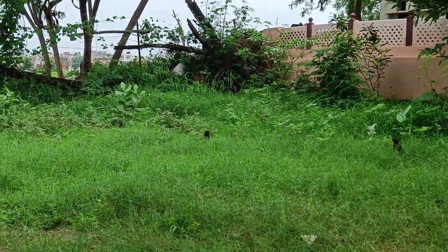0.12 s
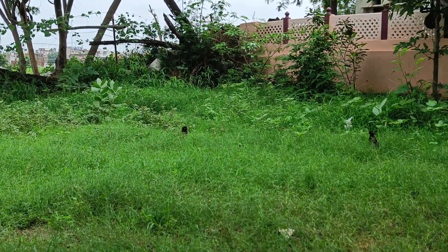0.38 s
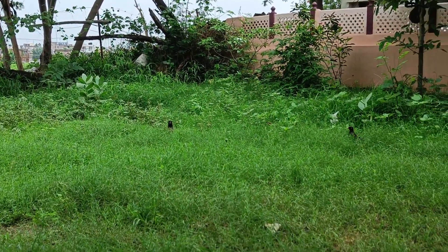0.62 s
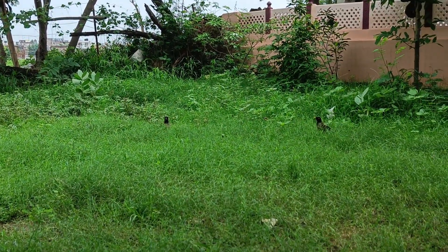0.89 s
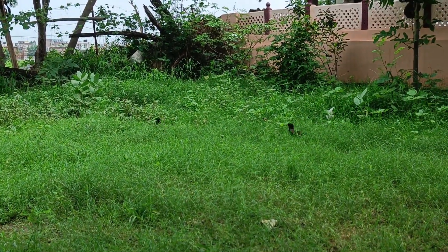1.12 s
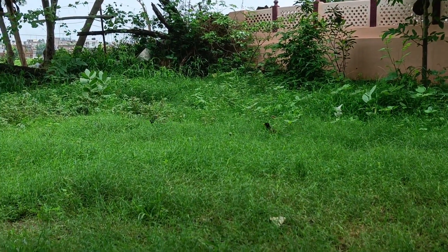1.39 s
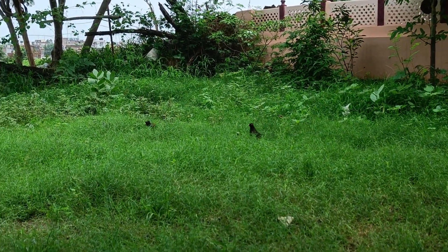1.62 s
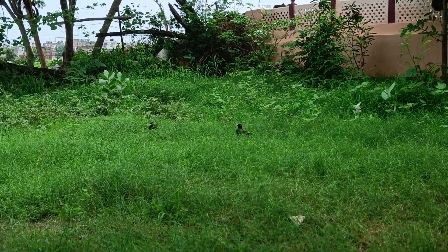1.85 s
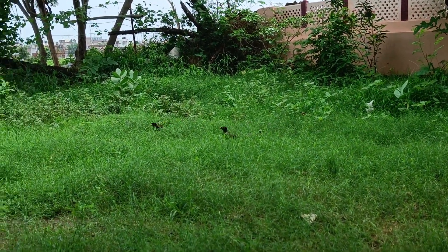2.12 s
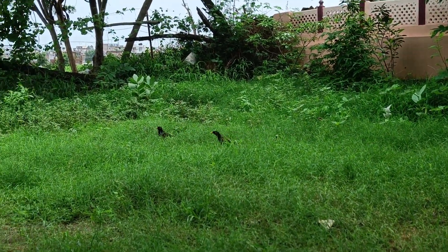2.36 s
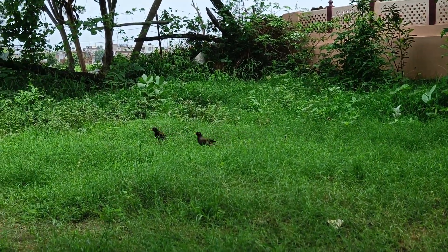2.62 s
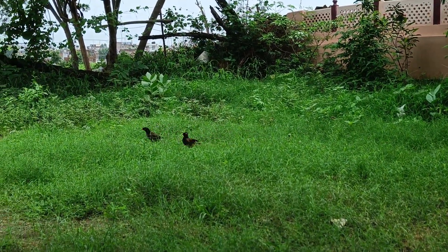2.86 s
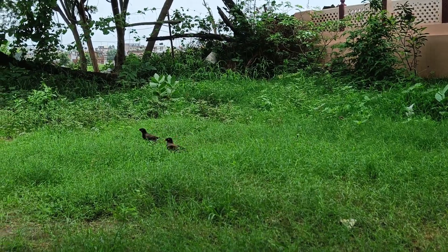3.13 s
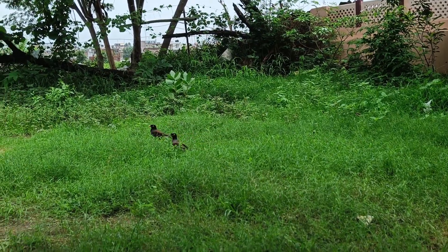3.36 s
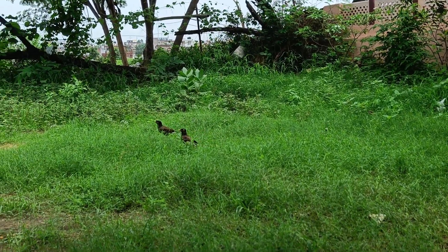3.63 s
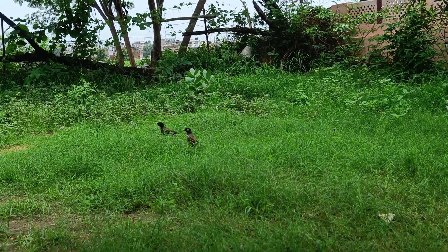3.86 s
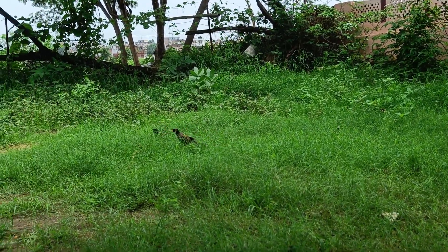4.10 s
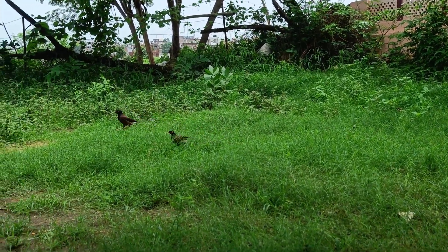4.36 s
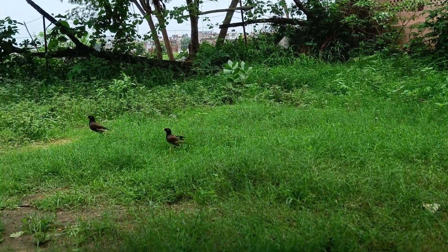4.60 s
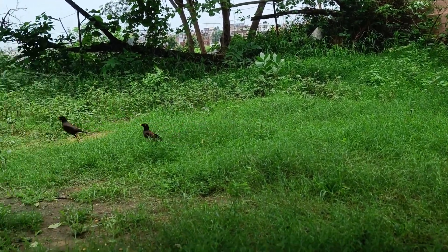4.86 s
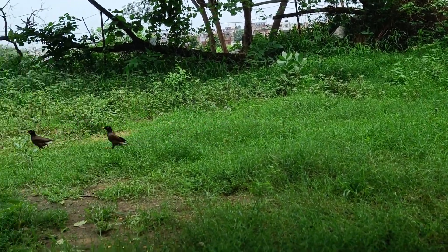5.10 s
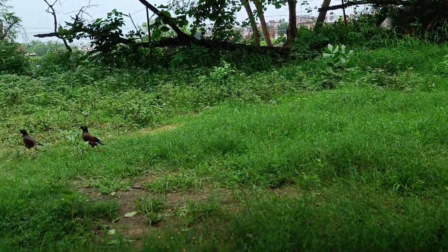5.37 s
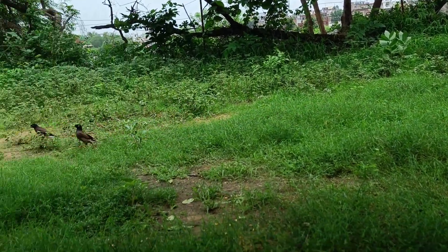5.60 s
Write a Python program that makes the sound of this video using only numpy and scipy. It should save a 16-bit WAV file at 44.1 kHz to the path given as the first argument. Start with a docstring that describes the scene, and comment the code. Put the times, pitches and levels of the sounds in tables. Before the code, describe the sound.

Outdoor stereo recording of birds in open grass, with distant town rumble and light wind buffeting. Quiet at first: a cut-off squawk, faint song phrases, a run of harsh rasps and knocks, high far chips, whistles and cooing doves. Then piercing chips, far louder than everything else, fire rapidly from a near caller, pause, and repeat briefly. Falling calls, coos and hissy puffs fill the gap before a final short burst. Leaves and wall add a slight tail.

```python
"""Birds on open grass ringed by trees and a wall, heard at two microphone ports over distant town rumble and wind.
It opens on dying husky notes, a squawk of pulsed noise, far caws and a twice-sung song; rasps and knocks follow.
Whistles, far chips and rising calls run on, and doves coo: gliding partials of a membrane, some with breath noise.
From 3.2 s a near caller fires sharp rising chips through a ringing throat, with falling calls among and after them.
Late on, thin chips and hissy puffs lead to a last burst of chips; leaves and wall scatter every call into a tail."""
import sys
import numpy as np
from scipy import signal
from scipy.fft import rfft, irfft
from scipy.io import wavfile
from scipy.ndimage import uniform_filter1d

SR = 44100
rng = np.random.default_rng(int(sys.argv[2]) if len(sys.argv) > 2 else 0)


def boost(x):
    """Linear amplitude factor 10**(x/20) for a level x in decibels (scalar or array-like)."""
    u = np.asarray(x, float) / 20
    return 10 ** u


def materialize(psi):
    """Save the field psi as 16-bit PCM at rate SR to the path in sys.argv[1].

    A 1-D psi becomes a single channel; in a 2-D psi each row is a channel.
    """
    bounded = np.clip(np.atleast_2d(psi).T, -1, 1)
    quanta = np.round(bounded * 32767).astype(np.int16)
    wavfile.write(sys.argv[1], SR, quanta)


N = 252693  # samples in the scene

# Call shapes before each event's stretch, pitch factor and level: t/ms from the event, f/Hz, level/dB
CHIP_SHAPE = [(-9, 2300, -26), (-7, 2900, -14), (-5, 3800, -8), (-3.5, 5300, -8), (-1.5, 7400, -4),
              (.5, 8800, 0), (4, 10800, -4), (8, 12500, -6), (13, 13600, -10), (17, 13300, -22)]
THIN_SHAPE = [(-8, 3300, -34), (-6, 3800, -24), (-4, 6800, -16), (-2, 8000, -4), (0, 8700, 0),
              (4, 11500, -5), (7, 14000, -5), (10, 15200, -4), (15, 15500, -20)]
SEEP_SHAPE = [(-8.5, 8700, -11), (1, 7400, -18), (0.5, 8500, 7), (7.5, 9300, -4), (15, 10200, -15),
              (32.5, 14000, -30)]
FALL_SHAPE = [(-35, 5500, -24), (-25, 5250, -10), (-10, 4450, -22), (0, 3850, -3), (15, 3350, -4),
              (24, 3000, -14), (36, 2520, 0), (48, 2500, 0), (52, 2350, -20), (62, 2050, -7),
              (75, 1750, -9), (90, 1550, -24)]
RISE_SHAPE = [(-22, 1800, -17), (-9.5, 2250, -7.5), (5, 2950, -.5), (16.5, 3050, -2.5), (33, 3400, -15.5),
              (44, 2900, -35)]
RASP_SHAPE = [(-15.5, 1300, -31), (-7, 1350, -3.5), (-0.5, 1330, -1.5), (8.5, 1170, -2), (16, 1020, -6),
              (27, 960, -17), (29, 900, -30)]
RASP_HISS_SHAPE = [(-30, 1495, -36), (-20.5, 1700, -5), (3.5, 1700, -1.5), (7.5, 1700, -1.5),
                   (13, 1460, -5.5), (30.5, 1300, -20), (51, 1300, -37)]
KNOCK_SHAPE = [(-5.5, 1030, -26), (-0.5, 1100, -1), (1.5, 1100, 0), (4.5, 1200, -13), (9, 1100, -33)]
CAW_SHAPE = [(-8, 530, -16), (5, 545, 0), (40, 548, -1), (70, 540, -2), (95, 520, -16)]
# The five notes of a song: t/ms from the song's start, f/Hz, level/dB
TSIP_SHAPE = [(-28, 5520, -21), (-17, 5444, -7.5), (4, 5200, -21), (40, 5400, -24)]
SLIDE_SHAPE = [(-5.5, 3250, -14), (0, 2730, -6), (22, 2560, -1), (60, 2150, -6), (96.5, 2240, -16.5),
               (134, 2350, -9.5)]
BURR_SHAPE = [(68, 2930, -15), (83.5, 2900, -2), (100.4, 2720, -10), (116.3, 3150, -7.5),
              (132.6, 2600, -17)]
PIPE_SHAPE = [(89.7, 3120, -2.5), (126.5, 3130, -2), (146, 3150, 0.5), (183, 3160, -12.5),
              (213.6, 3140, -14), (242, 1800, -32)]
DROP_SHAPE = [(145.5, 2700, -11), (156.8, 2540, -4), (167.3, 2170, 2), (183.4, 1990, -1), (206, 1940, -5.5),
              (255, 2030, -16), (325, 1950, -24)]

# Membrane partials: multiple of the pitch, level/dB
CHIP_PARTIALS = [(1, -0.73), (2, -0.5)]
FALL_PARTIALS = [(1, 0), (2, -6)]
RISE_PARTIALS = [(1, -3.5), (1.5, -11.5), (2, -14)]
RASP_PARTIALS = [(3, -0.5), (4, -10.5), (5, -5), (6, -9)]
KNOCK_PARTIALS = [(1, -0.32), (1.38, -0.47)]
CAW_PARTIALS = [(1, -3.5), (1.5, -14), (2, -4), (2.5, -18), (3, -21)]

# Near rising chips: t/s, level/dB, pitch factor, time stretch, factor on the throat's low rings as the neck stretches
CHIP_EVENTS = [(3.234, -16, .97, 1.08, 0.96), (3.284, -14, 1, 0.97, 0.97), (3.352, -13, 1.02, 1.02, 1.007),
               (3.432, -15.5, 1.0, 0.92, 1.04), (3.503, -14.5, 0.98, 0.98, 0.99),
               (3.575, -12.5, 1, .79, 0.994), (3.9, -15, 1.024, .95, 1.06), (3.96, -16.5, .97, 1.0, .99),
               (5.54, -21, 0.94, 0.96, 1.03), (5.592, -18, 0.95, 0.99, .94),
               (5.666, -23.5, 0.94, 0.94, 1.06)]
# The chip caller's throat, rings below 5000 Hz before that factor: f/Hz, gain/dB
THROAT_RINGS = [(2000, -1.5), (2900, -12), (3400, -12.5), (3750, 6), (4150, -5.5), (4700, -17.5),
                (5800, -13.5), (7000, -7), (8600, 0), (10500, -8.5), (13000, -7.5), (14500, 3),
                (15800, 1.5)]
# Repeated calls: t/s, level/dB, pitch factor
THIN_EVENTS = [(3.158, -22, 1.014), (3.2256, -20.5, 1.02), (5.038, -48.5, 1), (5.063, -44.5, .96),
               (5.112, -41.5, .94), (5.141, -41, .95), (5.181, -45.5, .9), (5.219, -41, .93),
               (5.294, -44, .92)]
FALL_EVENTS = [(3.841, -43.5, 0.98), (4.09, -44, 0.99), (4.388, -45, 0.97)]
RISE_EVENTS = [(1.346, -61, 0.78), (1.409, -72, 0.88), (1.86, -64, 0.84), (2.506, -58.5, 1.16),
               (2.667, -63, 0.98), (2.859, -61.5, 1.18), (4.52, -53.5, 1.0), (4.824, -54.5, 0.99),
               (5.03, -56, 1.05), (5.223, -55.5, 1.05)]
RASP_EVENTS = [(0.592, -47, 0.96), (.692, -41, 0.95), (0.794, -40.5, 0.94), (0.894, -40.5, 0.94),
               (0.996, -42.5, 0.96), (1.103, -46.5, 0.93)]
KNOCK_EVENTS = [(1.134, -55, 0.78), (1.177, -55, 0.91), (1.222, -52, 0.93), (1.267, -54, 0.95),
                (1.313, -53.5, 0.97), (1.359, -56, 0.94), (1.797, -62, 0.94)]
SONG_EVENTS = [(.204, -42, 1.0), (.628, -44.5, 0.98)]
CAW_EVENTS = [(.09, -58, 1.0), (.345, -55.5, 1.01)]
# Far high chips, and hissy puffs: t/s, level/dB
SEEP_EVENTS = [(.22, -55), (1.871, -51), (1.896, -44), (1.925, -45.5), (1.957, -42), (1.99, -50.5),
               (2.03, -44.5), (2.092, -39.5), (2.13, -48), (2.168, -44), (2.254, -42.5), (2.30, -51.5),
               (2.591, -56.5), (4.389, -55.5), (5.014, -58)]
PUFF_EVENTS = [(5.222, -52), (5.3, -50), (5.382, -51.5), (5.457, -52.5)]
# Distance of faint chips: level/dB heard all direct, direct dB lost per dB, stretch, stretch gained per dB
THIN_DISTANCE = (-18.5, 1.6, 0.67, 0.1247)
SEEP_DISTANCE = (-24, 1.1, .9, .01)

# Free notes, drawn 1 % below these pitches: start t/s, length t/s, first f/Hz, f/Hz glided to, level/dB
GLIDE_NOTES = [(.76, 0.069, 1295, 1328, -54), (1.1, 0.04, 6900, 7000, -56), (1.24, 0.3, 3025, 2997, -64),
               (1.3, .09, 5340, 6500, -84), (1.36, 0.035, 3030, 2350, -57.5),
               (1.36, 0.044, 3500, 3830, -65), (1.49, 0.056, 5230, 6130, -71),
               (1.69, 0.087, 5260, 6800, -77), (1.88, 0.031, 3990, 3590, -51.5),
               (1.94, .035, 3630, 3626, -53.5), (2.185, 0.091, 4580, 3970, -54.5),
               (2.26, .045, 4060, 2630, -49.5), (2.6, 0.1, 4000, 3700, -57), (2.63, 0.053, 5700, 5670, -62),
               (3.075, 0.14, 3940, 3700, -59.5), (3.61, .09, 3700, 1200, -53.5),
               (5.11, 0.096, 3530, 3550, -63.5), (5.24, .12, 3500, 3550, -66)]
COO_NOTES = [(2.085, 0.097, 567, 690, -57), (2.22, 0.1, 585, 753, -50.5), (2.36, 0.11, 719, 797, -50),
             (2.45, 0.095, 728, 783, -47.5), (2.552, .065, 707, 772, -46.5), (2.692, .065, 673, 770, -47),
             (3.62, .24, 616, 626, -52.5), (4.005, .09, 586, 657, -54.5), (4.25, .14, 591, 758, -50),
             (4.46, .12, 691, 759, -48), (4.578, 0.051, 710, 790, -53), (4.712, 0.063, 626, 699, -43)]
HUSKY_NOTES = [(0, 0.087, 1850, 2000, -37.5), (0, 0.033, 1466, 1520, -45)]
# Reedy whistles, the same columns and then: octave level/dB over the note
REEDY_NOTES = [(1.9, .07, 1447, 1554, -59, -13), (1.97, .19, 1493, 1684, -57.5, 1.9),
               (2.105, 0.15, 2473, 2205, -54.5, -12.5), (2.545, .065, 2160, 2190, -55.5, -1),
               (3.005, 0.084, 2083, 2254, -60, -0.5)]
# A squawk dying away; centre and width are averaged over the call: t/s, centre f/Hz, width f/Hz, level/dB
SQUAWK_TRACE = [(0, 2230, 1980, -40.5), (.05, 2300, 2010, -58.5), (.12, 2250, 2030, -70),
                (.2, 2300, 2000, -69)]

# Scattering by leaves and wall: f/Hz, time to fall 60 dB t/s
SCATTER_DECAY = [(500, 0.69), (2000, 0.4), (4000, 0.29), (8000, 0.35), (14000, 0.31)]
# Town and leaves ahead of the ports: f/Hz, level/dB per Hz, likeness of the ports (-1 opposed to 1 alike)
AIR_SPECTRUM = [(20, -93, .7), (50.25, -80.5, .9), (74.9, -79.5, 0.98), (124, -79, 0.97), (282, -84, 0.85),
                (640, -90, 0.32), (1385, -94.5, -.35), (2350, -101, 0.03), (3700, -107, 0), (6500, -107, 0),
                (9000, -111, 0.3), (13180, -116, 0.11), (16320, -120, 0.27)]
# Wind ahead of the ports' resonances: t/s, level/dB
WIND_LEVEL = [(0.0, -59), (0.03, -62.5), (3.19, -74.5), (3.22, -57), (3.48, -69), (3.53, -57), (3.67, -67),
              (4.1, -53.5), (4.12, -61.5), (4.99, -61.5), (5.15, -54), (5.2, -62), (5.68, -57.5),
              (5.73, -72)]
# Port resonances: f/Hz, left gain/dB, right gain/dB
PORT_GAIN = [(99.8, 2, 1.5), (970, 1.5, 0.5), (2292, 8.5, 3), (3700, 8, 1), (4600, 5, 4.5), (6500, -1, 4.5),
             (7840, 5.5, 5), (8347, 15.5, 1), (9840, 1.5, -16), (10450, -3, -22.5), (11180, -5, -19.5),
             (12580, 8.5, -9.5), (15300, -8, -2.5), (15160, -2, -5.5), (15900, -8.5, -4.5)]

AHEAD_LAG, BEHIND_LAG, SIDE_LAG = 19, -14, 2  # samples by which the left port hears later


def colour(x, points, column):
    """Filter by a gain curve in dB drawn over log frequency."""
    p = np.array(points)
    hz = np.fft.rfftfreq(x.shape[-1], 1 / SR)
    gain_db = np.interp(np.log(hz + 1), np.log(p[:, 0]), p[:, column])
    return irfft(rfft(x) * boost(gain_db), x.shape[-1])


def wobble(n, hz):
    """Smooth chance of spread 1, changing about hz times a second."""
    k = max(int(SR / hz), 1)
    smooth = uniform_filter1d(uniform_filter1d(rng.standard_normal(n), k), k)
    return smooth * np.sqrt(1.5 * k)  # makes up the spread lost to smoothing


def add(bus, start, sound):
    """Lay a sound on a bus from a start in seconds."""
    i = int(start * SR)
    bus[i:i + len(sound)] += sound[:N - i]


def trace(rows):
    """Draw a table's columns sample by sample, with a 2.4 ms soft edge for both ends."""
    s, *columns = np.transpose(rows)
    t = np.arange(s[0], s[-1], 1 / SR)
    edge = np.clip(np.minimum(t - s[0], s[-1] - t) / 0.0024, 0, 1)
    return [np.interp(t, s, c) for c in columns], edge


def syrinx(hz, partials, rough, flutter_hz=400, top_hz=16000, low_hz=0):
    """Vibrating membrane: roughness shakes pitch and strength; partials other than 1 fade towards the range's ends."""
    shaken_hz = hz * (1 + 0.094 * rough * wobble(len(hz), flutter_hz))
    phase = 2 * np.pi * np.cumsum(shaken_hz) / SR
    tone = 0
    for k, db in partials:
        room_hz = np.minimum(top_hz - k * hz, k * hz - low_hz)
        fade = np.clip(room_hz / 800, k == 1, 1)  # a partial at exactly 1 is never faded
        tone = tone + boost(db) * np.sin(k * phase) * fade
    return np.sqrt(2) * tone * boost(9.1 * rough * wobble(len(hz), flutter_hz))


def repeat(shape, events, partials, rough, breath_db=-40, breath_hz=(2500, 9500), throat=None, **voice):
    """Play a call at each event as membrane plus gusty breath; returns direct sound and what the leaves get."""
    direct, full = np.zeros(N), np.zeros(N)
    airway = signal.butter(3, breath_hz, "bandpass", fs=SR, output="sos")
    for s, db, factor, *more in events:
        stretch, direct_db = more or (1, 0)
        (hz, shape_db), edge = trace([(ms * stretch / 1000, f, d) for ms, f, d in shape])
        # the airstream tears into short gusts
        gusts = boost(breath_db + 1.4 * wobble(len(hz), 580))
        breath = signal.sosfilt(airway, rng.standard_normal(len(hz)) * gusts)
        call = syrinx(hz * factor, partials, rough, **voice) + breath
        call = call * boost(db + shape_db) * edge
        if throat:
            call = colour(call, throat(s), 1)
        start = s + shape[0][0] * stretch / 1000
        add(direct, start, call * boost(direct_db))
        add(full, start, call)
    return direct, full


def ranged(events, near_db, loss, stretch, smear):
    """Distance from loudness: a fainter chip has less direct sound and a slower sweep."""
    placed = []
    for s, db, *factor in events:
        pitch = factor[0] if factor else 1
        placed.append((s, db, pitch, stretch + smear * (near_db - db), loss * (db - near_db)))
    return placed


def notes(rows, attack_s, release_s, glide=0.95, droop=0.0, sag_db_per_s=0.0, edge_db=14):
    """Attack, hold, release; pitch glides over a share of the note and droops as the breath runs out."""
    u, out = np.linspace(0, 1, num=25), []
    for s, length, first, last, db, *octave in rows:
        rise = np.clip(1 - u * length / attack_s, 0, 1)
        fall = np.clip(1 - (1 - u) * length / release_s, 0, 1)
        level = db - edge_db * (rise + fall) - sag_db_per_s * u * length
        hz = (first + (last - first) * np.clip(u / glide, 0, 1)) * (1 - droop * fall)
        out.append(np.transpose([s + u * length, hz, level] + [level + own for own in octave]))
    return out


def free_notes(traced, rough, flutter_hz=400):
    """Membrane sings free notes; the octave follows its own column where there is one."""
    bus = np.zeros(N)
    for rows in traced:
        (hz, db, *octave), edge = trace(rows)
        stack = [(0.99, db)] + [(2, own) for own in octave]
        add(bus, rows[0][0], edge * syrinx(hz, stack, rough, flutter_hz))
    return bus, bus


# Each voice below returns rows of: (direct, scattered) sound, lag in samples, left minus right dB, scatter dB

def throat_at(s):
    """The chip caller's throat at one moment, its low rings shifted as the neck stretches."""
    factor = {row[0]: row[-1] for row in CHIP_EVENTS}[s]
    return [(hz * factor if hz < 5000 else hz, db) for hz, db in THROAT_RINGS]


def near_chips():
    """Sharp rising chips: a fast membrane sweep and bright breath ring the throat."""
    direct_db = 1.33
    events = [(*row[:-1], direct_db) for row in CHIP_EVENTS]
    chips = repeat(CHIP_SHAPE, events, CHIP_PARTIALS, rough=0.11, breath_db=-16.5, breath_hz=(3000, 15900),
                   throat=throat_at, top_hz=10500)
    return [(chips, AHEAD_LAG, 1.0, -4)]


def far_air(s):
    """Air and leaves dull the top of the thin chips, by half a dB for each dB that distance takes."""
    db = {row[0]: row[1] for row in THIN_EVENTS}[s]
    return [(9000, 0.0029), (13000, 0.5 * (db - THIN_DISTANCE[0]))]


def thin_chips():
    """Thin chips near and far: a single swept partial with faint breath, smeared and dulled by distance."""
    events = ranged(THIN_EVENTS, *THIN_DISTANCE)
    return [(repeat(THIN_SHAPE, events, [(0.98, 0.0029)], rough=0.033, throat=far_air), AHEAD_LAG, 1.0, -3)]


def far_chips():
    """Far high chips: a rough membrane sweep heard more through its scatter the fainter it is."""
    events = ranged(SEEP_EVENTS, *SEEP_DISTANCE)
    return [(repeat(SEEP_SHAPE, events, [(0.93, -0.5), (1.4, -19.5)], rough=0.39), AHEAD_LAG, 1.0, -4)]


def chatter():
    """Rasps of fluttering overtones with hiss over them, and short two-partial knocks."""
    rasps = repeat(RASP_SHAPE, RASP_EVENTS, RASP_PARTIALS, rough=0.3, flutter_hz=910)
    hiss = repeat(RASP_HISS_SHAPE, RASP_EVENTS, [(0.93, -14)], rough=0.35, breath_db=1.5)
    knocks = repeat(KNOCK_SHAPE, KNOCK_EVENTS, KNOCK_PARTIALS, rough=0.1)
    return [(rasps, SIDE_LAG, -2.0, -6), (hiss, SIDE_LAG, -2.0, -6), (knocks, SIDE_LAG, -1.0, -10)]


def falling_calls():
    """Falling calls: the membrane's octave sounds only within a middle band."""
    falls = repeat(FALL_SHAPE, FALL_EVENTS, FALL_PARTIALS, rough=0.2, top_hz=7980, low_hz=5090)
    return [(falls, BEHIND_LAG, -3.0, -8)]


def rising_calls():
    """Breathy rising calls: three partials with strong airway noise."""
    rises = repeat(RISE_SHAPE, RISE_EVENTS, RISE_PARTIALS, rough=0.12, breath_db=-3.0, breath_hz=(2000, 5000))
    return [(rises, AHEAD_LAG, 3.0, -6)]


def song():
    """A five-note song sung twice, its notes overlapping and differing in roughness."""
    slide = repeat(SLIDE_SHAPE, SONG_EVENTS, [(0.99, -.3)], rough=0.17)
    drop = repeat(DROP_SHAPE, SONG_EVENTS, [(1, -.3)], rough=0.24)
    tsip = repeat(TSIP_SHAPE, SONG_EVENTS, [(0.99, -.3)], rough=.15)
    burr = repeat(BURR_SHAPE, SONG_EVENTS, [(1, -.3)], rough=0.65, flutter_hz=695)
    pipe = repeat(PIPE_SHAPE, SONG_EVENTS, [(1, -1.9), (2, -5.5)], rough=0.11)
    return [(slide, BEHIND_LAG, -6.0, -5), (drop, BEHIND_LAG, -6.0, -5), (tsip, AHEAD_LAG, 1.1, -6),
            (burr, AHEAD_LAG, 1.1, -5), (pipe, AHEAD_LAG, 1.1, -6)]


def gliding_partials():
    """Single gliding partials: whistles, loose octaves of reedy calls, low rings of far chips and a falling call."""
    glides = notes(GLIDE_NOTES, attack_s=0.013, release_s=0.022)
    return [(free_notes(glides, rough=0.16), AHEAD_LAG, 1.0, -6)]


def reedy_whistles():
    """Reedy whistles: a gliding partial and its octave, drooping as the breath runs out."""
    reedy = notes(REEDY_NOTES, attack_s=.03, release_s=0.042, glide=.6, droop=0.12)
    return [(free_notes(reedy, rough=0.11), AHEAD_LAG, 1.0, -6)]


def husky_notes():
    """Rough fluttering notes dying steadily away as the scene opens."""
    husky = notes(HUSKY_NOTES, attack_s=.001, release_s=.02, sag_db_per_s=388, edge_db=1)
    return [(free_notes(husky, rough=0.6, flutter_hz=695), AHEAD_LAG, 1.0, -5)]


def dove_coos():
    """Soft low coos: slow flutter, an early glide and a droop as the breath runs out."""
    coos = notes(COO_NOTES, attack_s=0.026, release_s=.03, glide=0.54, droop=.2, edge_db=8)
    return [(free_notes(coos, rough=0.14, flutter_hz=80), BEHIND_LAG, -1.0, -13)]


def crow_caws():
    """Far caws: a very rough membrane with partials at whole and half multiples."""
    return [(repeat(CAW_SHAPE, CAW_EVENTS, CAW_PARTIALS, rough=0.54), SIDE_LAG, -1.0, -6)]


def squawk():
    """Noise swelled by an uneven throat pulse, through one broad resonance."""
    (hz, width, db), _ = trace(SQUAWK_TRACE)
    pulse_hz = 291 * (1 + 0.11 * wobble(len(hz), 185))
    pulse = 1 + 0.3 * np.sin(2 * np.pi * np.cumsum(pulse_hz) / SR)
    band = [hz.mean() - width.mean() / 2, hz.mean() + width.mean() / 2]
    resonance = signal.butter(2, band, "bandpass", fs=SR, output="sos")
    call = signal.sosfilt(resonance, pulse * rng.standard_normal(len(hz)))
    bus = np.zeros(N)
    add(bus, SQUAWK_TRACE[0][0], call / call.std() * boost(db))
    return [((bus, bus), BEHIND_LAG, -1.0, -10)]


def puffs():
    """Bursts of treble hiss with no tone, perhaps wingbeats."""
    attack_ms, release_ms = 11, 27
    shape = [(-attack_ms, 1, -18), (0, 1, 0), (release_ms, 1, -14)]
    events = [(s, db, 1) for s, db in PUFF_EVENTS]
    hiss = repeat(shape, events, [], rough=0, breath_db=1.5, breath_hz=(6000, 15500))
    return [(hiss, AHEAD_LAG, 1.1, -5)]


def leaves(gap_ms=0.89, sparkle_db=2.5):
    """Scatter off leaves and wall: a dense noise response for each port, each band dying at its own rate."""
    t, out = np.arange(SR // 2) / SR, 0
    centres = np.log([hz for hz, _ in SCATTER_DECAY])
    noise = rfft(rng.standard_normal((2, len(t))) * boost(sparkle_db * wobble(len(t), 490)))
    log_hz = np.log(np.fft.rfftfreq(len(t), 1 / SR) + 1)
    for k, (_, t60) in enumerate(SCATTER_DECAY):
        share = np.interp(log_hz, centres, np.arange(len(centres)) == k)
        out = out + irfft(noise * share, len(t)) * boost(-60 * t / t60)
    onset = np.clip(t * 1000 / gap_ms - 1, 0, 1)  # silent for one gap, full after two
    return out * onset / np.sqrt(SR / 40)


def wind():
    """Deep buffeting, partly shared and partly different at each port."""
    band = signal.butter(2, [22, 52], "bandpass", fs=SR, output="sos")
    low = signal.sosfilt(band, rng.standard_normal((2, N)))
    low = low + 1.2 * low.sum(0) / 2
    return low / low.std() * boost(np.interp(np.arange(N) / SR, *np.transpose(WIND_LEVEL)))


def air():
    """Town rumble and leaves: octave bands of noise that swell together and flicker alone."""
    p, hz, out = np.array(AIR_SPECTRUM), np.fft.rfftfreq(N, 1 / SR), 0
    like = np.clip(np.interp(np.log(hz + 1), np.log(p[:, 0]), p[:, 2]), -1, 1)
    # shared and opposed noise, scaled to unit power per Hz at each port
    mid, side = rfft(rng.standard_normal((2, N))) * np.sqrt([1 + like, 1 - like]) * np.sqrt(SR / 4)
    pair, swell = np.array([mid + side, mid - side]), wobble(N, 0.68)
    for octave in np.arange(4, 14.5, 1.):
        share = np.clip(1 - np.abs(np.log2(hz + 1) - octave), 0, 1)
        out = out + irfft(pair * share, N) * boost(.7 * swell + 1.0 * wobble(N, 8))
    return colour(out, AIR_SPECTRUM, 1)


def scene():
    """Each voice reaches the ports with its own lag and balance and feeds the leaves."""
    voices = (near_chips() + thin_chips() + far_chips() + chatter() + falling_calls() + rising_calls() + song()
              + gliding_partials() + reedy_whistles() + husky_notes() + dove_coos() + crow_caws() + squawk()
              + puffs())
    near, sent = np.zeros((2, N)), np.zeros(N)
    for (direct, full), lag, pan_db, scatter_db in voices:
        near += [np.roll(direct, lag) * boost(pan_db / 2), direct * boost(-pan_db / 2)]
        sent += full * boost(scatter_db)
    tail = signal.fftconvolve(sent[None], leaves(), axes=1)[:, :N]
    return near + tail + air() + wind()


def top_cut(x):
    """Nothing passes above the cut-off."""
    return signal.sosfilt(signal.butter(12, 15950, fs=SR, output="sos"), x)


def record(dry):
    """Each port colours the sound with its own resonances; the loudest peaks are rounded."""
    heard = np.array([colour(dry[0], PORT_GAIN, 1), colour(dry[1], PORT_GAIN, 2)])
    rounded = 0.92 * np.tanh(heard / 0.97)
    return top_cut(rounded)


dry = scene()
out = record(dry)
materialize(out)
```